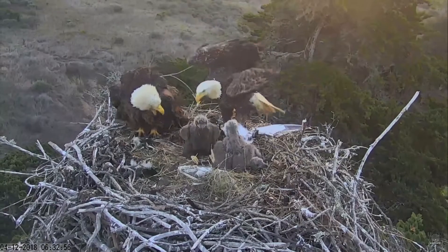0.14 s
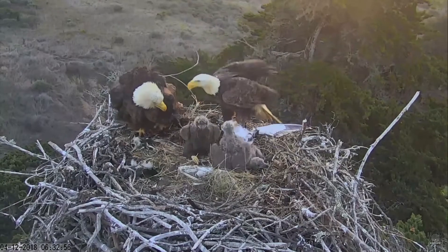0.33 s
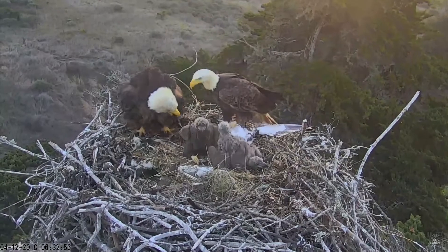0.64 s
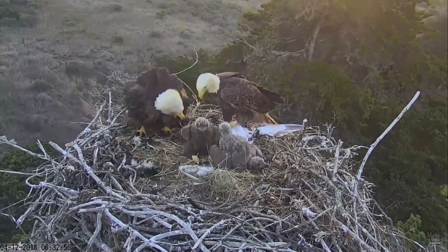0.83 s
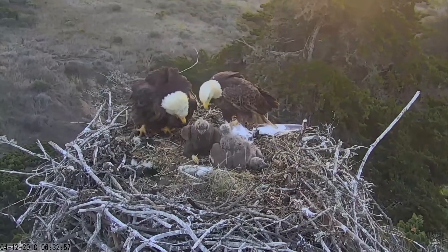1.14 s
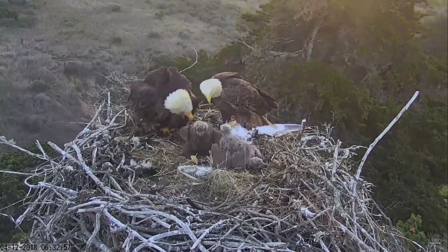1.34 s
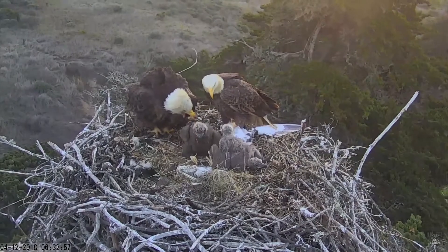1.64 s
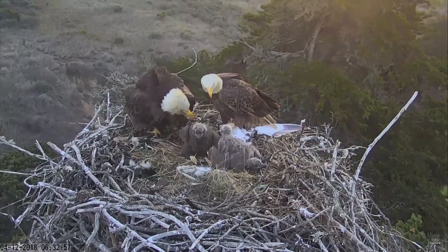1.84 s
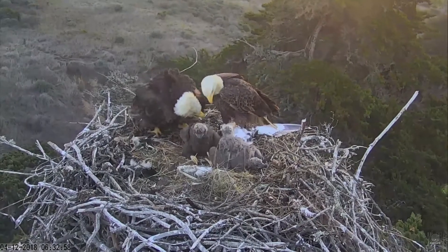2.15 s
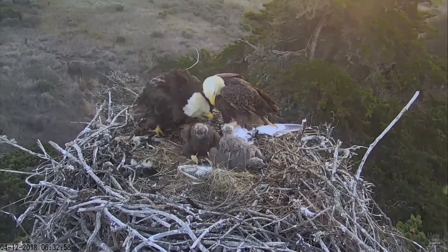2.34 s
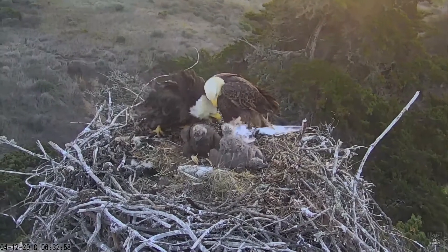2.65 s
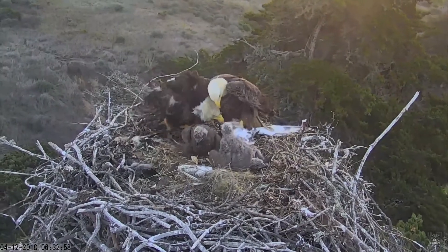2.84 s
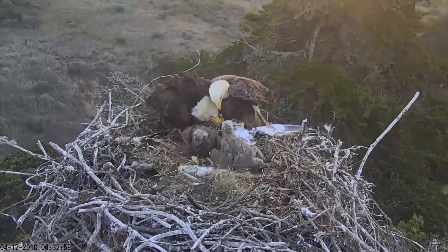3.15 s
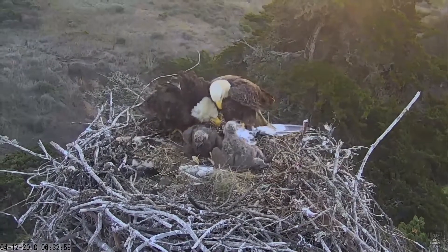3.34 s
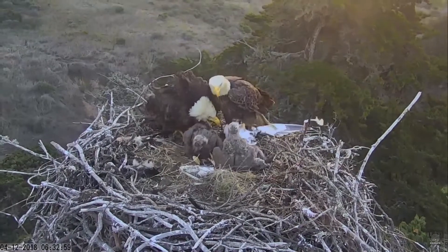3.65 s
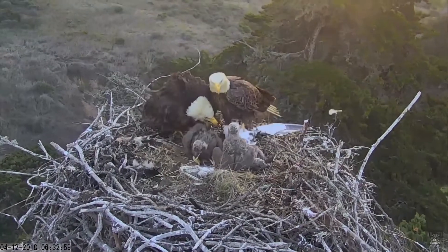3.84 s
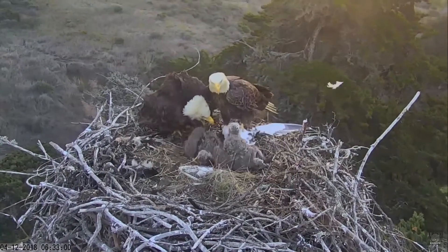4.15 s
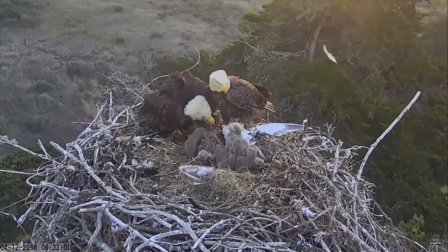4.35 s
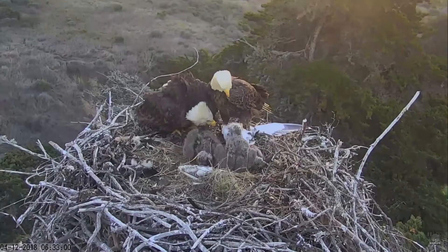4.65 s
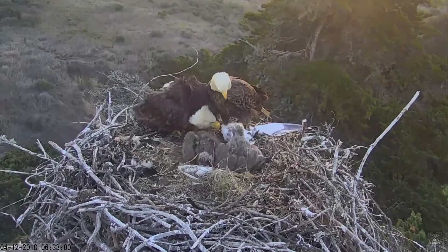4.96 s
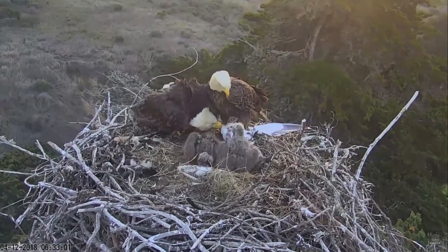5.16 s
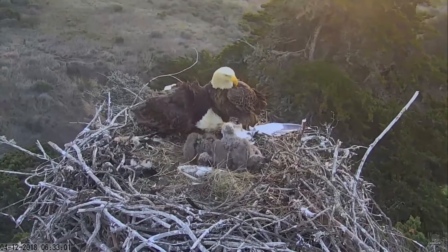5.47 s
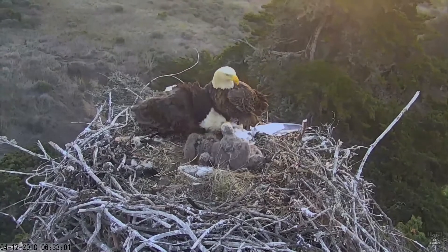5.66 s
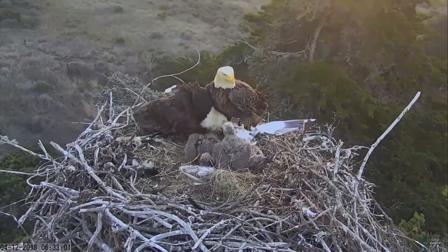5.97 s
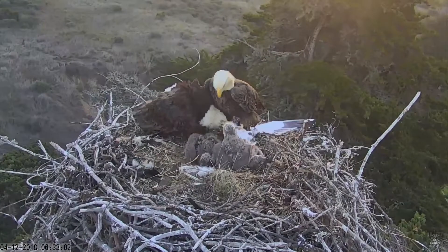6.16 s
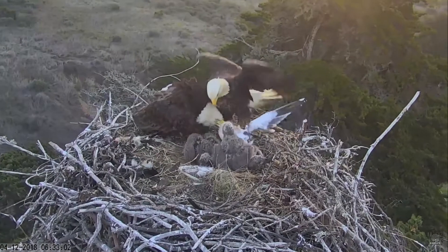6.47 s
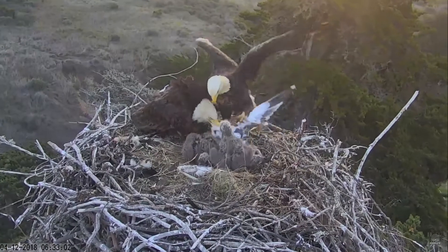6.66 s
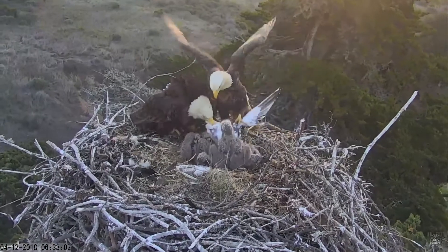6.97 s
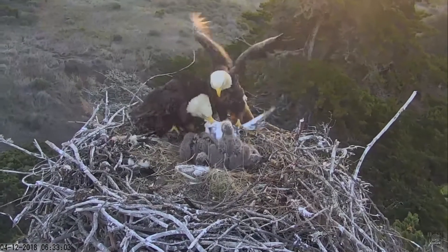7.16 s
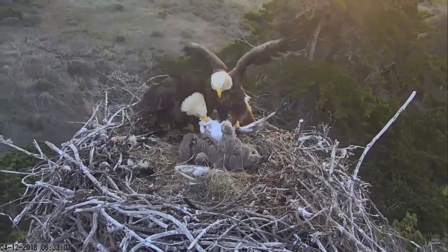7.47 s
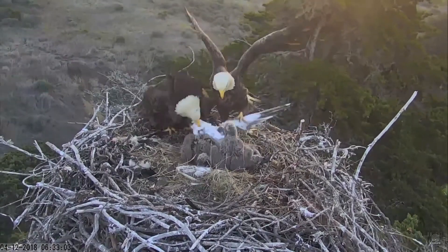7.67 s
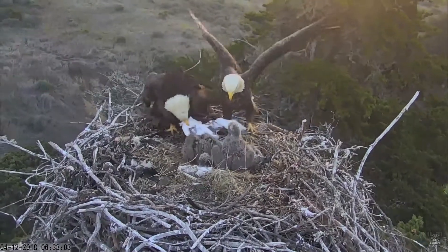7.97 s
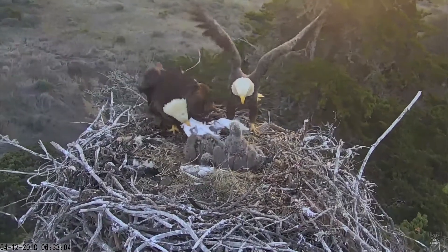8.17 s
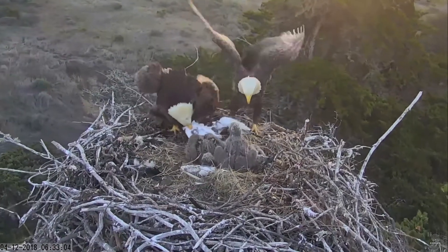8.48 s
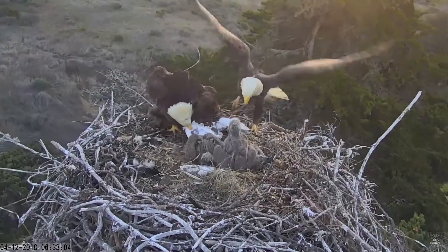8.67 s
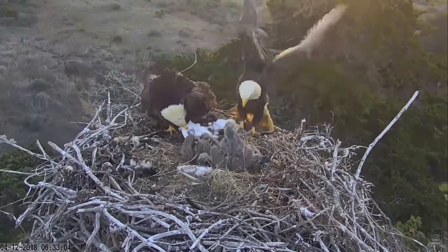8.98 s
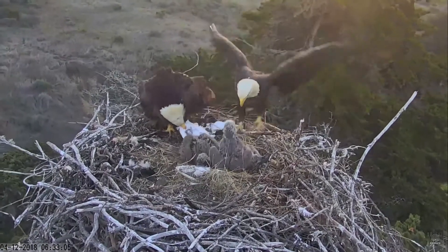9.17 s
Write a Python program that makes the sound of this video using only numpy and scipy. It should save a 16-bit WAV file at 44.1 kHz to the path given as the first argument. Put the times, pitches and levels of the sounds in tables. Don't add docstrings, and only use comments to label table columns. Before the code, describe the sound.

Begging whistles, almost pure tones, slide upward, flutter, crack hoarsely and drop abruptly. They begin mid-call and repeat about every second or so over rustling branches and low wind bumps. A weak cricket ticks far behind. Later the gusts swell into heavy buffeting, a strained call rasps through them, dry snaps cluster, and a last whistle starts. Open air, an exposed low-grade microphone, with faint electronic whine and harsh aliasing.

```python
import sys
import numpy as np
from scipy import signal
from scipy.fft import rfft, irfft, next_fast_len
from scipy.io import wavfile
from scipy.ndimage import uniform_filter1d

SR = 44100
rng = np.random.default_rng(int(sys.argv[2]) if len(sys.argv) > 2 else 0)


def boost(x):
    u = np.asarray(x, float) / 20
    return 10 ** u


def put_to_file(sound):
    columns = np.atleast_2d(sound).T
    safe = np.clip(columns, -1, 1)
    whole_steps = np.round(safe * 32767)
    wavfile.write(sys.argv[1], SR, whole_steps.astype(np.int16))


N = 411453

# time [s], pitch [Hz], effort [dB].
EARLY_CALLS = [
    [(0.0, 4597, -19), (.05, 4716, -15), (.088, 4750, -18), (.098, 4780, -21), (.129, 4850, -19),
     (.178, 5170, -24), (.231, 4920, -22), (.307, 5080, -22.5), (.366, 5020, -22)],
    [(.719, 3200, -9), (.797, 3200, -13), (.902, 3230, -16), (.91, 3380, -13.5), (1.169, 3850, -18),
     (1.304, 4010, -23), (1.423, 4620, -30), (1.47, 4430, -33), (1.652, 5180, -27)],
    [(2.231, 2950, -18.5), (2.335, 3450, -19.5), (2.551, 4004, -25), (2.679, 4530, -28), (2.84, 4590, -35),
     (2.847, 4940, -33), (2.933, 5370, -25), (3.11, 5350, -30), (3.188, 5170, -23)],
    [(3.569, 2960, -19), (3.66, 3370, -25), (3.8, 3787, -19.5), (3.885, 3880, -24), (3.94, 4290, -24.5),
     (4.07, 4390, -22.5), (4.124, 4130, -21), (4.415, 4480, -23.5), (4.457, 4035, -11.5)],
]
# time [s], pitch [Hz], effort [dB].
LATE_CALLS = [
    [(4.892, 2720, -33), (4.993, 2930, -22.5), (5.042, 3210, -22.5), (5.19, 3380, -28.5),
     (5.535, 3890, -20), (5.627, 4350, -24.5), (6.08, 4620, -29), (6.228, 5400, -26), (6.258, 4830, -25)],
    [(6.712, 2910, -24), (6.802, 3080, -28), (6.931, 3410, -27), (7.09, 3930, -35.5), (7.392, 4310, -31),
     (7.6, 4300, -29), (7.914, 4280, -20.5), (8.06, 3990, -18), (8.243, 4290, -22)],
    [(8.775, 2800, -24), (8.892, 2720, -25), (8.964, 3170, -19), (9.042, 2930, -23), (9.082, 3137, -17.5),
     (9.134, 3220, -18.5), (9.241, 3650, -18), (9.27, 3940, -22.5), (9.33, 4200, -25)],
]
# time [s], pitch [Hz], effort [dB].
HOARSE_END = [(1.656, 4860, -32), (1.69, 4825, -30), (1.712, 4540, -38.5), (1.8, 4440, -40.5),
              (1.86, 4540, -34), (1.912, 4590, -32)]
# start [s], length [s], from [Hz], to [Hz], peak [dB].
DROPS = [(.3735, .0105, 4780, 2100, -7.5), (1.918, .014, 4500, 2400, -20), (3.192, .011, 5000, 2500, -22),
         (4.459, .018, 3950, 2500, -9), (6.261, .013, 4600, 2390, -17.5), (8.246, .013, 4170, 2700, -7.5)]


def rms_one(x):
    return x / np.sqrt(np.mean(x ** 2) + 1e-20)


def drift(rate_hz):
    steps = rng.standard_normal(int(N / SR * 80) + 200)
    memory = np.exp(-2 * np.pi * rate_hz / 80)
    slow = rms_one(signal.lfilter([1], [1, -memory], steps)[198:])
    return np.interp(np.arange(N) / SR * 80, np.arange(len(slow)), slow)


def gate(spans, edge_s):
    t = np.arange(N) / SR
    inside = sum(1. * (t >= a) * (t <= b) for a, b in spans)
    return uniform_filter1d(np.minimum(inside, 1), max(int(edge_s * SR), 1))


def gust_db(t, sharp):
    # peak [s], pressure [dB], rise [s per 10 dB], fall [s per 10 dB],
    # sharpness [dB].
    gusts = [(.56, -34.5, .08, .05, .5), (.77, -24, .04, .15, 2), (.97, -25, .12, .2, -2.3),
             (1.14, -25, .08, .2, -2), (1.29, -26, .04, .1, -.7), (1.58, -25, .08, .1, -2),
             (1.685, -13.5, .015, .11, -.8), (1.81, -20, .06, .1, -1), (1.93, -21.5, .2, .25, -2.4),
             (2.45, -26, .15, .06, -3), (2.6, -22.5, .15, .1, -4), (2.73, -20, .1, .08, -2),
             (2.86, -19.5, .1, .07, -2.8), (3.1, -26, .15, .15, -4), (3.27, -19.5, .08, .2, -4.5),
             (3.54, -22, .07, .1, -6), (3.72, -26, .06, .7, -5), (4.63, -23.5, .06, .07, -7),
             (4.75, -22, .04, .05, -7), (4.93, -24, .12, .08, -7), (5.2, -28, .6, .9, -4),
             (5.5, -20.5, .05, .2, -6), (5.69, -23, .05, .1, -3), (5.88, -14.5, .15, .12, -.7),
             (6.18, -19, .12, .08, -3), (6.29, -20, .06, .25, -2), (6.53, -21, .04, .08, -3),
             (6.62, -18, .05, .15, -1), (6.78, -19.5, .15, .4, -3.7), (7.14, -16, .12, .15, -6),
             (7.27, -10.5, .08, .2, -.8), (7.5, -11.5, .06, .3, -2.9), (7.86, -14.5, .08, .15, -1.5),
             (8.035, -9, .025, .2, -3.5), (8.11, -8.5, .08, .15, -3.5), (8.29, -10, .15, .2, -1),
             (8.45, -11, .2, .3, .5), (8.75, -15, .2, .2, -4), (8.93, -14, .1, .15, -1),
             (9.15, -13.5, .4, .6, .3)]
    calm_db = -36
    power = boost(2 * calm_db)
    for peak, peak_db, rise, fall, sharp_db in gusts:
        below_peak = 10 * np.maximum((peak - t) / rise, (t - peak) / fall)
        power = power + boost(2 * (peak_db + sharp * sharp_db - below_peak))
    return 10 * np.log10(power) + 30


def wind_levels():
    # time [s], level [dB].
    branches = [(0.0, -53.5), (.13, -51.3), (.55, -54), (.78, -52.3), (1.14, -51.5), (1.72, -48),
                (2.09, -50), (2.91, -44), (3.36, -46.7), (4.3, -41), (4.65, -45), (5.49, -47.8),
                (6.51, -47), (6.89, -43.5), (7.44, -40), (8.5, -35), (8.88, -38.5), (9.33, -41)]
    # level [dB], share of the gust, share of its sharp edge, share of the leaves [ratios].
    layers = [
        (-32, 1.01, .0, .0),
        (-38, .2, 1.04, .24),
        (-37.7, .0, .5, .7),
        (-43.6, .11, .04, .97),
    ]
    t = np.arange(0, N / SR + .01, .01)
    leaves = np.interp(t, *np.transpose(branches)) + 45
    round_gust, sharp_gust = gust_db(t, 0), gust_db(t, 1)
    return t, *[db + a * round_gust + b * sharp_gust + c * leaves for db, a, b, c in layers]


def wind(shared_db=0.83, own_db=0.45, grain_db=-12):
    layer_hz = (105, 190, 1000, 2500)
    # frequency [Hz], density [dB per Hz].
    housing = [(22, -16), (50, -3.5), (64, 2.5), (87, 5), (150, -10), (334, -16), (678, -22), (966, -14.5),
               (1410, -35), (1910, -40.5), (2300, -30), (2900, -32), (4100, -42), (5000, -55),
               (8000, -59.5)]
    s, *levels = wind_levels()
    size = next_fast_len(N)
    octave = np.log2(np.arange(1, size // 2 + 2) * SR / size)

    click_size = boost(5.3 * np.minimum(rng.exponential(1, size), 4.5))
    grit = (rng.random(size) < 400 / SR) * click_size * rng.choice([-1, 1], size)
    bright = np.clip(octave - np.log2(700), 0, 1)
    air = rfft(rng.standard_normal(size)) + boost(grain_db) * bright * rfft(rms_one(grit))
    housing_hz, housing_db = np.transpose(housing)
    air *= boost(np.interp(octave, np.log2(housing_hz), housing_db))

    offset_db = np.array([[-3], [4], [8], [21]])
    levels = np.array(levels) + offset_db
    t = np.arange(N) / SR
    rush, thump, expected_power = np.zeros(N), np.zeros(N), np.zeros(N)
    lumps = drift(3.5)
    for centre in np.arange(4, 13.5, .5):
        band = irfft(air * np.clip(1 - 2 * np.abs(octave - centre), 0, 1), size)[:N]
        band_db = [np.interp(centre, np.log2(layer_hz), column) for column in levels.T]
        unrest_db = (centre > 7) * (shared_db * lumps + own_db * drift(36))
        gain = boost(np.interp(t, s, band_db) + unrest_db)
        if centre < 7.6:
            thump = thump + gain * band
            expected_power = expected_power + 1.5 * gain ** 2 * np.mean(band ** 2)
        else:
            rush += gain * band
    swing = uniform_filter1d(thump ** 2, int(.03 * SR)) / expected_power
    return boost(27.5) * (rush + thump * (swing + .03) ** -.3)


def cricket():
    # time [s], peak [dB].
    chirps = [(1.008, -41), (1.14, -39), (1.262, -38), (1.397, -44), (1.508, -40), (1.636, -39),
              (1.8622, -39), (1.9829, -38), (2.107, -34), (2.3672, -36), (2.4703, -40), (2.6055, -34),
              (2.7286, -32), (2.8533, -36), (2.9715, -35.5), (3.3513, -37), (3.478, -40), (3.7172, -32),
              (3.8395, -31), (4.6033, -42), (4.7257, -46), (5.225, -48), (5.359, -48)]
    out, t = np.zeros(N), np.arange(int(0.026 * SR)) / SR
    throb = 1 + .4 * np.cos(2 * np.pi * 120 * t)
    chirp = np.sin(np.pi * t / t[-1]) * throb * np.sin(2 * np.pi * 2700 * t)
    for s, peak_db in np.array(chirps) - [.005, 0]:
        out[int(s * SR):int(s * SR) + len(t)] += boost(peak_db + 2.5) * chirp
    return out


def snaps():
    # time [s], peak [dB].
    snap_times = [
        (7.257, -42),
        (7.6146, -34),
        (7.9593, -35),
        (8.4264, -42),
        (8.4542, -30),
        (8.4794, -31),
        (8.527, -33),
        (8.5535, -34),
        (8.5864, -40),
    ]
    out, t = np.zeros(N), np.arange(int(0.0043 * SR)) / SR
    noise = rng.standard_normal((len(snap_times), len(t)))
    for (s, peak_db), burst in zip(snap_times, noise):
        out[int(s * SR):int(s * SR) + len(t)] += boost(peak_db + 9.5) * burst * np.exp(-t / 0.0035)
    return signal.sosfilt(signal.butter(1, [2200, 5000], "band", fs=SR, output="sos"), out)


def pips():
    # centre [s], length [s], from [Hz], to [Hz], peak [dB].
    glides = [(0.092, .005, 4770, 3600, -25), (0.394, 0.014, 4600, 4250, -36),
              (0.402, 0.0068, 3970, 4000, -26), (.413, 0.026, 4280, 4000, -22),
              (0.416, .018, 3380, 2760, -19.5), (0.458, 0.053, 2850, 2570, -38),
              (.575, .12, 3970, 3880, -47), (1.672, .04, 5200, 5430, -39), (1.7, .03, 5330, 5000, -36),
              (1.927, .005, 3500, 2900, -16), (1.932, 0.015, 4200, 4100, -29),
              (1.934, .012, 4920, 4900, -40), (3.202, .008, 4400, 4400, -28),
              (3.214, .016, 4500, 3520, -28), (3.224, .014, 3300, 3860, -22),
              (3.225, .014, 4530, 4330, -28), (3.235, 0.015, 3800, 3120, -21),
              (3.244, .016, 3630, 3300, -19), (4.491, .04, 2560, 2420, -24),
              (6.278, 0.0065, 3900, 4700, -30), (6.293, 0.018, 3650, 3440, -26),
              (6.306, 0.011, 3260, 3100, -22), (6.309, 0.017, 4110, 3700, -32),
              (8.284, .012, 3980, 3900, -23)]
    out = np.zeros(N)
    for centre, length, from_hz, to_hz, peak_db in glides:
        u = np.linspace(0, 1, int(length * SR))
        phase = 2 * np.pi * np.cumsum(from_hz + (to_hz - from_hz) * u ** 1.4) / SR
        swell = np.sin(np.pi * u ** 1.305) ** 2
        throb = 1 + 0.33 * np.sin(2 * np.pi * 330 * length * u)
        start = int((centre - .6 * length) * SR)
        out[start:start + len(u)] += boost(peak_db) * swell * throb * np.sin(phase)
    return out


def throat():
    # share of its length, share of its fall [ratios], level re its peak [dB].
    drop_shape = [
        (0, 0, -10),
        (.42, .3, 0),
        (.7, .72, -8),
        (1, 1, -27),
    ]
    # swing [Hz], change at the top [dB].
    hooks = [(580, 1.5), (750, -9), (600, -4), (450, 7), (520, -16), (270, 2.5)]
    # centre [s],
    # half length [s], slip [Hz], change [dB].
    wavers = [(1.244, .06, 215, -2.5), (1.53, .06, -130, 2.5), (1.582, .035, -150, -7),
              (2.985, .04, -230, -2.5), (3.035, .04, -10, -15), (3.078, .025, -150, -3),
              (3.133, .016, -480, 3), (3.115, .012, 60, -8), (3.714, .05, -95, -.1), (4.153, .03, 95, .1),
              (4.212, .05, -100, 1.5), (4.312, .04, -150, 2.5), (5.256, .04, 130, 3), (5.34, .04, -55, -.5),
              (5.395, .035, 75, 3), (5.465, .04, 100, 3), (5.67, .03, -255, 1.2), (5.783, .045, -290, 1.2),
              (5.861, .03, -220, -1.5), (5.935, .035, 150, -4), (6.016, .06, -490, 1.2),
              (6.855, .05, -80, .1), (6.892, .03, -40, -18), (7.074, .025, 50, -12), (7.17, .05, 20, -9),
              (7.25, .05, -120, 2.5), (7.46, .022, -40, -14), (7.51, .03, 150, -8), (7.585, .02, 220, -10),
              (7.715, .065, 70, -11),
              (1.37, .05, -70, .5), (2.305, .035, -190, -3), (3.104, .018, 150, 1.2),
               (3.975, .03, -65, .3), (5.122, .035, -80, -.1), (5.572, .035, 110, -3),
               (6.067, .022, 110, -.5), (6.13, .07, -150, -4), (7.612, .025, -120, 2.5),
               (7.79, .05, -110, -3), (8.145, .06, -70, -3), (8.229, .018, 240, -3),
              (8.11, .11, 5, 2.5), (2.8, .06, -60, -1.2), (.05, .03, 50, .1), (5.978, .02, 70, -1.2),
               (.855, .055, -85, .1), (.95, .04, 40, .1), (2.238, .008, -60, -4), (5.62, .035, -40, .1),
               (5.5, .02, -45, .1), (4.22, .02, 45, .1), (4.29, .015, 50, .1), (4.375, .03, -65, 1.5),
               (4.442, .013, -90, 1.5), (4.968, .025, -80, 1.2), (5.075, .035, -55, .1),
               (5.285, .04, -50, .5), (5.41, .08, 5, 2.2), (5.85, .015, 60, -1.2), (5.882, .015, -60, -2.2),
               (6.727, .012, 20, 5), (6.738, .006, 20, -10), (6.751, .012, 40, 5), (6.769, .012, 40, -9),
               (7.135, .03, -80, -1.5), (7.255, .015, -10, -5), (7.315, .025, -60, 3), (7.4, .03, 20, -4),
               (7.795, .02, 90, .8), (8.108, .03, -75, -.5), (8.228, .012, -120, -3)]
    calls, t = EARLY_CALLS + LATE_CALLS, np.arange(N) / SR
    drop_points = []
    for s, length, from_hz, to_hz, peak_db in DROPS:
        for u, fall, db in drop_shape:
            drop_points.append((s + u * length, from_hz + fall * (to_hz - from_hz), peak_db + db))
    s, hz, effort_db = np.array(sorted(sum(calls, HOARSE_END + drop_points))).T
    pitch, level_db = np.interp(t, s, hz), np.interp(t, s, effort_db)

    for rows, (swing_hz, top_db) in zip(calls[1:], hooks):
        u = np.clip((t - rows[0][0]) / (rows[1][0] - rows[0][0]), 0, 1)
        arch = np.abs(np.sin(np.pi * u ** .66))
        pitch = pitch + swing_hz * arch
        level_db = level_db + top_db * arch ** 4.
    for centre, half, slip_hz, change_db in wavers:
        part = slice(int((centre - half) * SR), int((centre + half) * SR))
        slip = np.cos(np.pi / 2 * (t[part] - centre) / half) ** 2
        pitch[part] += slip_hz * slip
        level_db[part] += change_db * slip
    return pitch, level_db - 25 * np.maximum(pitch - 4500, 0) / 1000


def flutter(phase):
    # start [s], end [s], beat [Hz], upper side [dB], lower side [dB].
    beats = [(0.09, .135, 141, -22, -13), (1.66, 1.712, 470, -20, -12), (1.712, 1.819, 335, 1.2, -5.5),
             (1.814, 1.922, 398, -3, -8), (2.745, 2.85, 300, -5, -30), (3.025, 3.055, 450, -25, 16),
             (3.908, 3.947, 230, -10, -15), (4.392, 4.418, 330, -28, -15), (5.898, 5.966, 265, -20, -2.5),
             (7.507, 7.6, 254, -14, -20), (7.728, 7.803, 299, -15, -20), (8.215, 8.24, 400, -22, -7)]
    # start [s], end [s], level re the whistle [dB].
    rasps = [
        (3.91, 3.945, -13),
        (5.89, 5.91, -11),
        (5.91, 5.97, -13),
        (8.022, 8.235, -14),
    ]
    out = np.zeros(N)
    uneven, upper_swing, lower_swing = drift(25), drift(30), drift(30)
    rasp = rms_one(uniform_filter1d(rng.standard_normal(N), int(0.0015 * SR)))
    out += sum(boost(db) * gate([(a, b)], .01) for a, b, db in rasps) * rasp * np.sin(phase)
    for start, end, beat_hz, upper_db, lower_db in beats:
        part = slice(int((start - .008) * SR), int((end + .008) * SR))
        beat = 2 * np.pi * beat_hz * np.cumsum(1 + 0.047 * uneven[part]) / SR
        upper = np.sin(phase[part] + beat) + boost(-18) * np.sin(phase[part] + 2 * beat)
        lower = np.sin(phase[part] - beat) + boost(-12) * np.sin(phase[part] - 2 * beat)
        ramp = np.arange(len(beat))
        fade = np.clip(np.minimum(ramp, ramp[::-1]) / (0.02 * SR), 0, 1)
        sides = boost(upper_db + 1.8 * upper_swing[part]) * upper
        sides = sides + boost(lower_db + 3 * lower_swing[part]) * lower
        out[part] += fade * (1 + 0.17 * rasp[part]) * sides
    return out


def whistles():
    pitch, level_db = throat()
    dropping = gate([(s - .004, s + length) for s, length, *_ in DROPS], 0.0034)
    rounded = uniform_filter1d(pitch, int(0.01374 * SR))
    pitch += (1 - dropping) * (rounded - pitch)
    wobble = 0.003996 * (1 + .9 * gate([(7.15, 8.24)], .05)) * drift(14.2)
    phase = 2 * np.pi * np.cumsum(pitch * (1 + wobble)) / SR
    tone = np.sin(phase) + flutter(phase)

    doubled = tone ** 2 - uniform_filter1d(tone ** 2, size=15)
    hoarse = gate([(HOARSE_END[0][0], HOARSE_END[-1][0])], .01)
    tone += boost(-23 + level_db) * np.sin(2 * phase) + boost(-21) * hoarse * doubled
    spans = [(rows[0][0], rows[-1][0] + .008) for rows in EARLY_CALLS + LATE_CALLS + [HOARSE_END]]
    spans += [(s, s + length) for s, length, *_ in DROPS]
    return np.sqrt(2) * boost(level_db + 0.85 * drift(30)) * gate(spans, 0.0012) * tone


def scene():
    return (whistles() + pips() + cricket() + snaps() + wind())[None]


def band_limit(x):
    return signal.sosfilt(signal.butter(12, 17130, fs=SR, output="sos"), x)


def record(dry):
    up, down = 160, 147
    t = np.arange(N) / SR
    whine_level = boost(-52.5 + 1.2 * drift(8))
    whine_hz = 9561 + 12 * drift(15)
    whine = np.sqrt(2) * whine_level * np.sin(2 * np.pi * np.cumsum(whine_hz) / SR)
    x = signal.resample_poly(dry[0] + whine, up, down)
    x += boost(-64) * rng.standard_normal(len(x))
    x = x / (1 + np.abs(x / 0.5) ** 14) ** (1 / 14)
    picked = x[np.arange(N) * up // down]
    x = signal.sosfilt(signal.ellip(10, .2, 60, 15830, fs=SR, output="sos"), picked)
    x = signal.lfilter(*signal.butter(1, 8, "high", fs=SR), x)
    return band_limit(x[None])


dry = scene()
out = record(dry)
put_to_file(out)
```